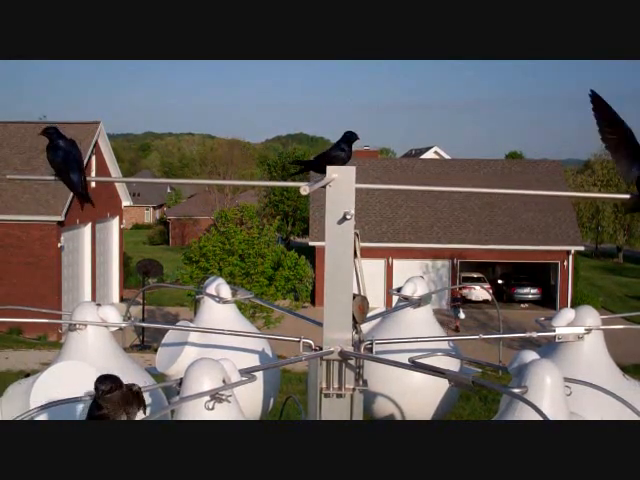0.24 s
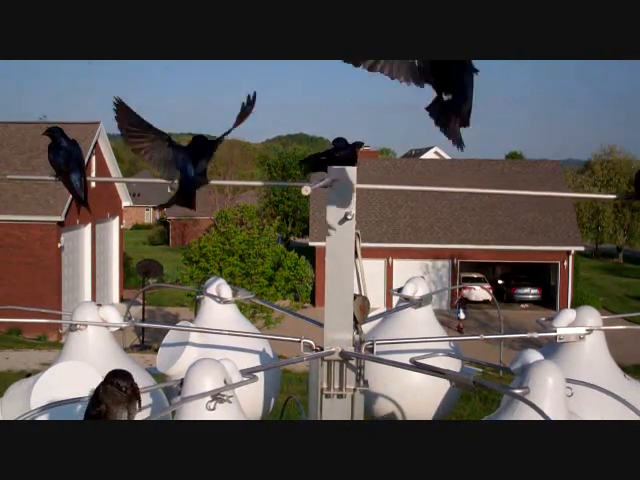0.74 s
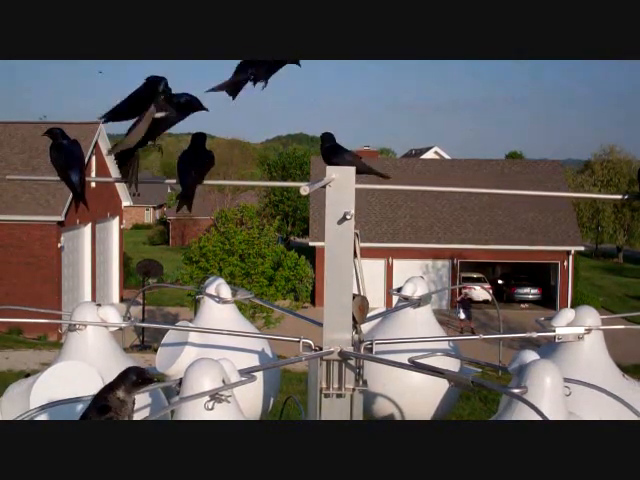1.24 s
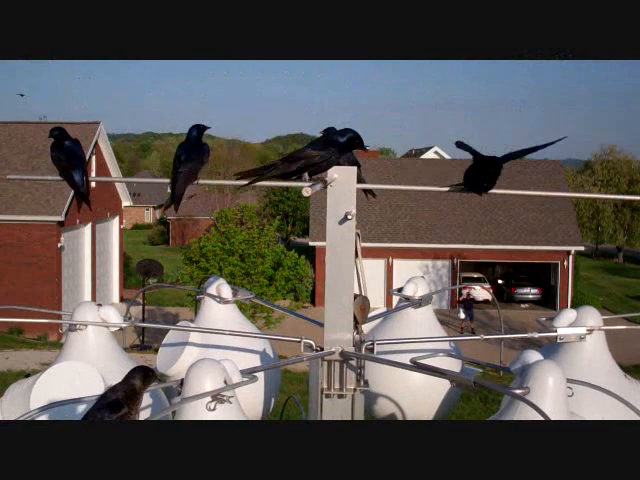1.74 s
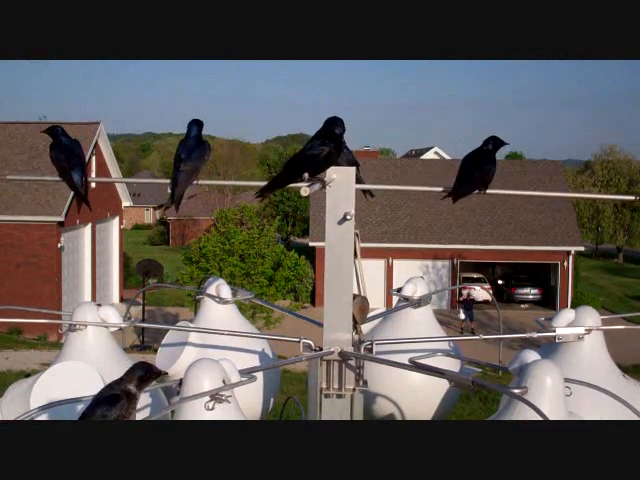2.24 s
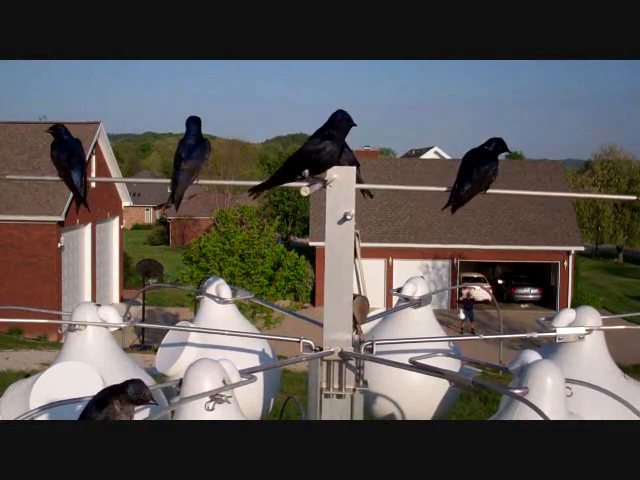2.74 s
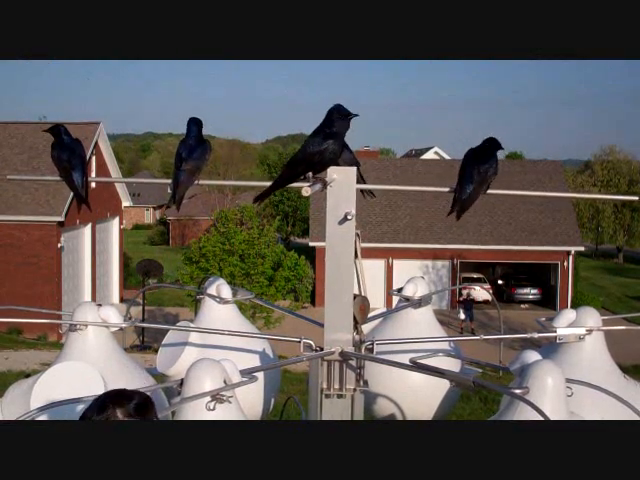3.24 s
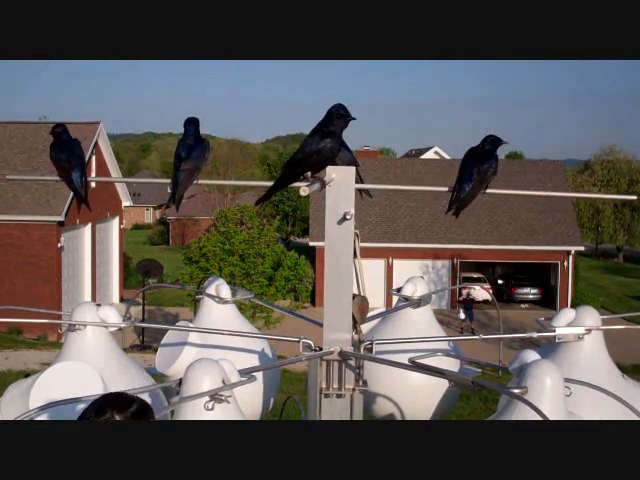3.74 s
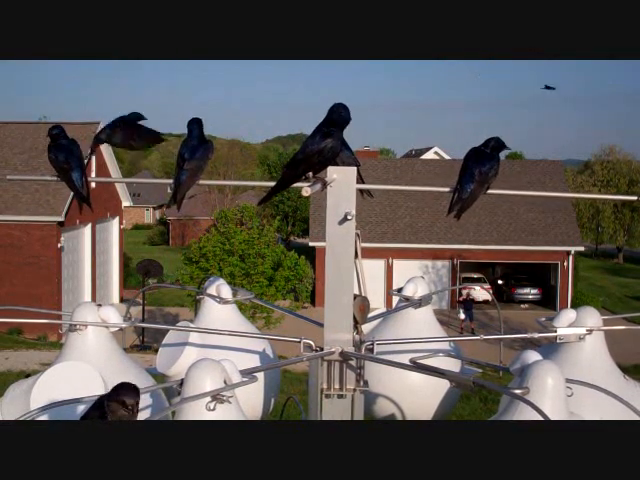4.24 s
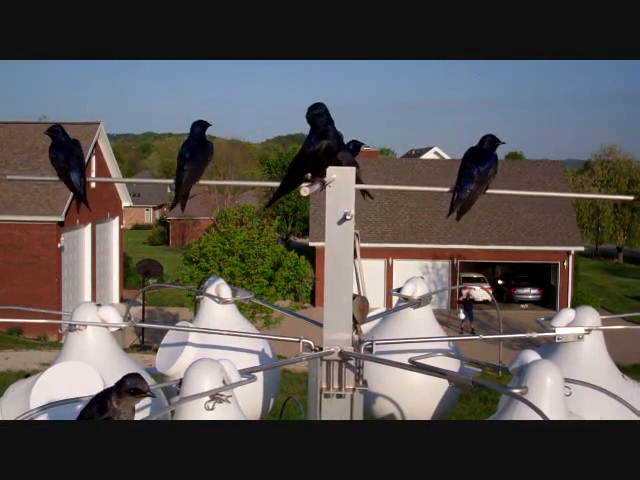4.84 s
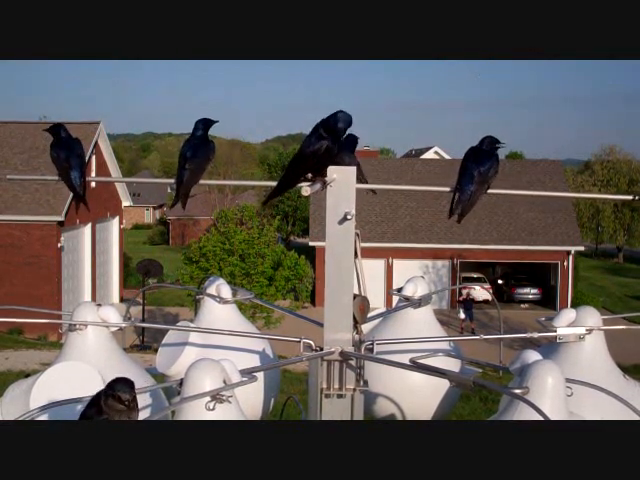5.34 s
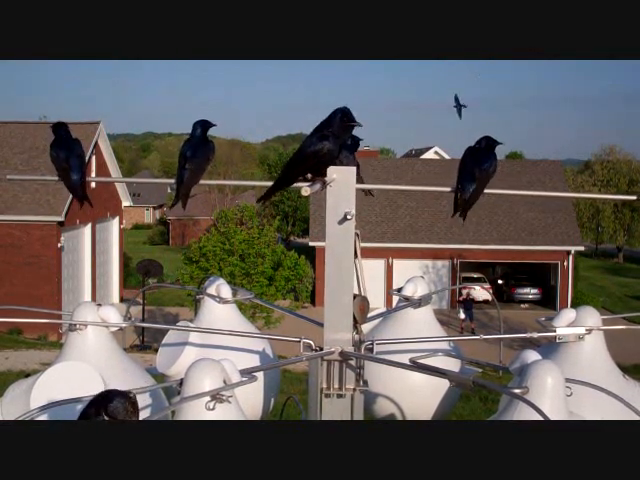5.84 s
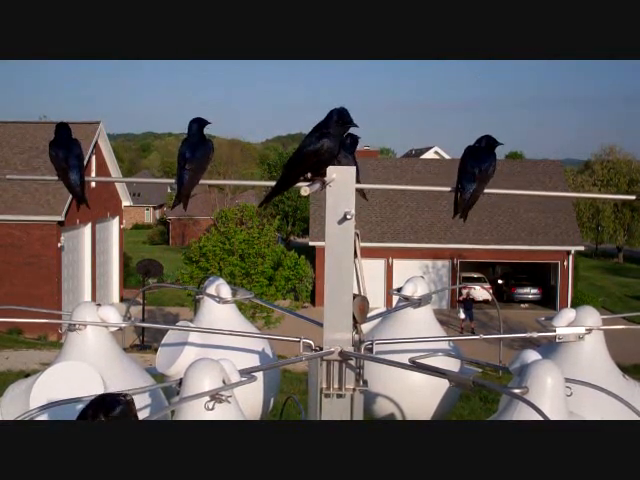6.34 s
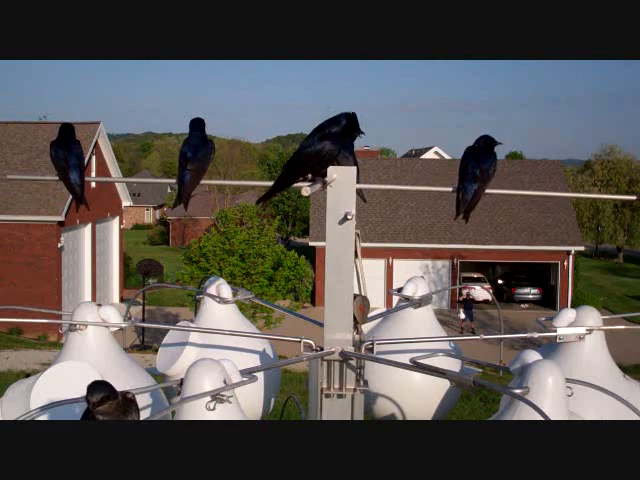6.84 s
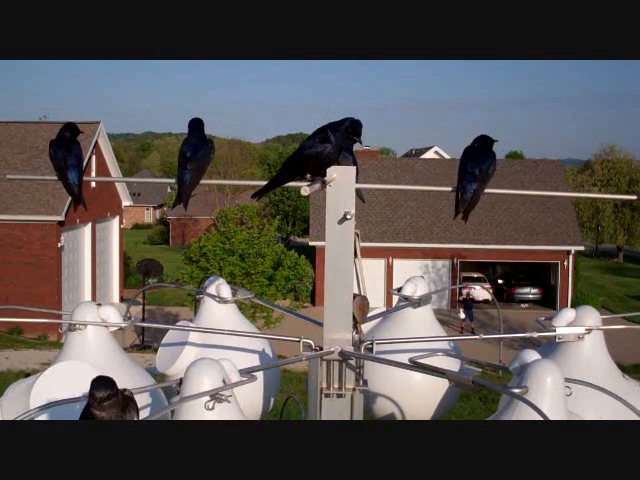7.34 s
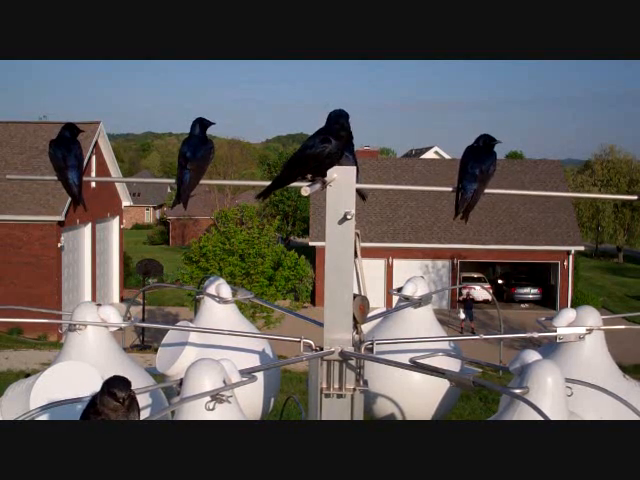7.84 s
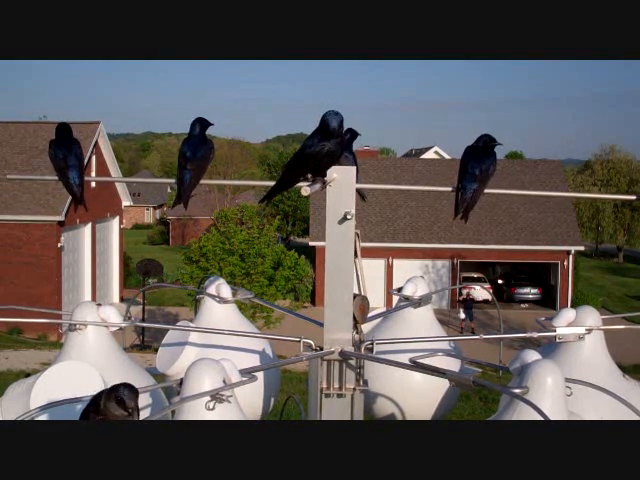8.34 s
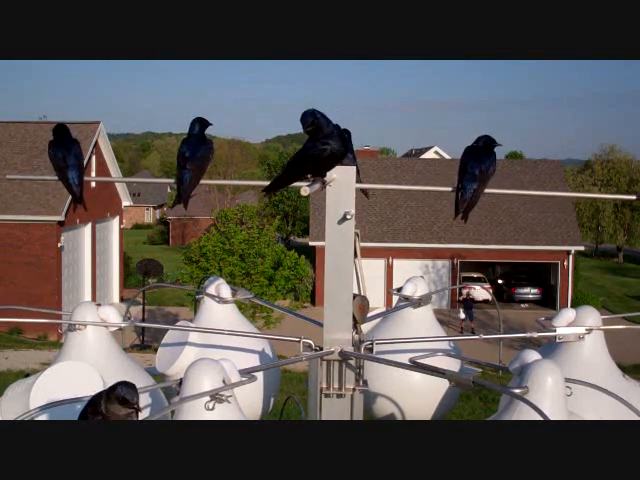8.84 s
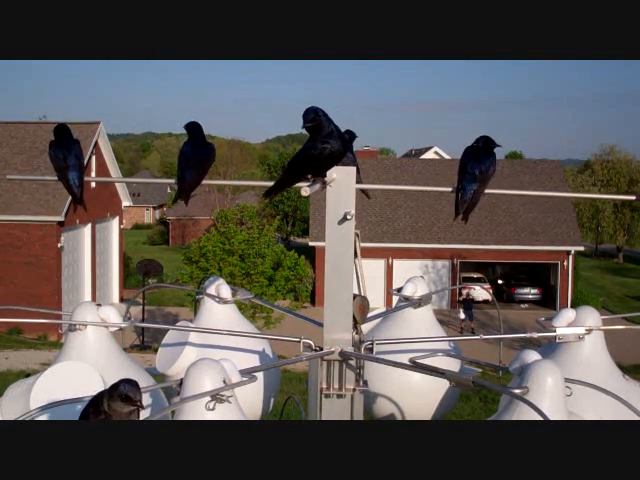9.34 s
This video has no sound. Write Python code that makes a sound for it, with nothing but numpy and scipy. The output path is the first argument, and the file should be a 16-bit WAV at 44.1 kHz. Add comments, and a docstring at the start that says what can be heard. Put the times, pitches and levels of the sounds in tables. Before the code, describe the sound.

A colony of purple martins calls close to stereo microphones in a rural yard, bright and a little left-heavy. From 0 to 0.7 s rough falling buzzes overlap quick scolding stutters; a loud dry rattle bursts at 0.8 s. Gurgling downward chews and more stutters crowd 0.9 to 2.7 s, with a strong one at 2.4 s, then a thinner stretch with a stutter near 2.9 s. At 4.0 and 4.3 s rattles return, followed by whistles, chirps and chews, strong around 5.5 to 6.1 s. Gliding whistles and tumbling chirps fill 6.2 to 6.9 s; a sharp stutter hits at 7.2 s. Dry clicks run from 7.55 to 8 s around a piercing chew at 7.7 s. Sparser calls follow, notably at 8.75 and 9.3 s. Faint distant birds, hiss, machine drone and slight air rumble continue throughout, dipping after loud calls and swelling back.

```python
"""Martin colony at a gourd rack

Rural yard, camera microphones close to the rack: purple martins buzz, stutter, chew, whistle, rattle, chirp and click.
Voices are gliding tones with overtones shaped by the beak; each call glances off the gourds and rings in the yard.
Farther off are more birds, hiss, a machine's drone and a light rumble of air.
The camera's limiter ducks the whole sound after loud calls, so the background dips and swells back."""
import sys
import numpy as np
from scipy import signal
from scipy.fft import rfft, irfft, next_fast_len
from scipy.io import wavfile
from scipy.ndimage import uniform_filter1d, minimum_filter1d, map_coordinates

SR = 44100
rng = np.random.default_rng(int(sys.argv[2]) if len(sys.argv) > 2 else 0)


def write(x):
    x = np.atleast_2d(x).T
    wavfile.write(sys.argv[1], SR, np.round(np.clip(x, -1, 1) * 32767).astype(np.int16))


N = 422919
TIME = np.arange(N) / SR  # seconds
EDGE_HZ = 14100  # upper band limit

# Call levels are nominal, ahead of beak colour, perch, stereo balance and limiter.
# distant hiss, its spectrum before levelling: [pitch_hz, relative_level_db]
HISS_SPECTRUM = [(25, -40), (60, -7.5), (220, -0.5), (400, 0), (800, 5), (1300, 1.5), (2200, -3),
                 (3500, -16.5), (6000, -19.5), (10500, -31), (13000, -38)]
# slow swell of that hiss: [time_s, level_db]
HISS_SWELL = [(0, -40.5), (1, -40), (2.3, -44), (3.7, -42.5), (5, -42), (6.3, -41.5), (7.5, -39.5),
              (8.6, -44), (9.6, -43)]
# hums of a far machine: [pitch_hz, width_hz at half amplitude, level_db]
DRONE_HUMS = [(52, 6.2, -72), (449.5, 11, -70), (587, 36, -51.5), (880, 17, -57)]
# throat and open beak, a resonance curve: [pitch_hz, gain_db]
BEAK_RESPONSE = [(900, -30.5), (1300, -15.5), (1800, -8.5), (2400, -1), (3000, 2), (4000, -2), (5000, -9.5),
                 (6200, -14.5), (7500, -14), (9500, -19.5), (11000, -24), (13000, -23)]
# partials of the syrinx from the fundamental up: [level_db]
SYRINX_PARTIALS = [0.5, -9, -10.5, -13, -14]
# falling buzzes: [start_s, length_s, start_hz, end_hz, level_db, fade_db (negative swells)]
BUZZ_CALLS = [(0, 0.05, 2970, 2835, -21.5, 17), (0.268, 0.12, 3430, 2510, -21.5, 4.5),
              (0.4, 0.14, 4080, 3120, -42.5, -18), (0.497, 0.064, 4280, 3565, -19, -14),
              (0.564, 0.11, 3500, 2714, -10, 11), (1.059, 0.13, 3670, 2620, -29.5, -9.5),
              (2.016, 0.13, 3860, 3280, -42.5, -10), (3.574, .15, 4220, 2510, -41.5, -3.5),
              (5.069, 0.14, 4070, 2920, -29.5, 13.5), (9.214, 0.085, 4300, 3370, -44.5, -15)]
# echo of the yard: [pitch_hz, decay_s over 60 dB]
YARD_DECAY = [(1000, 0.092), (3000, 0.32), (9000, 0.56)]
# scolding runs of downsweeps: [start_s, sweeps_count, spacing_s, top_hz, level_db, change_per_sweep_db]
STUTTER_CALLS = [(0.163, 3, 0.023, 3180, -16, 1.5), (0.413, 4, 0.02, 2800, -41, 4),
                 (.497, 5, .022, 3060, -19.5, 1.5), (0.938, 2, 0.022, 3300, -11.5, 1),
                 (1.555, 3, 0.022, 3167, -10, 0.5), (2.077, 2, 0.032, 2970, -35, 3.5),
                 (2.176, 2, 0.022, 2760, -39, -9), (2.895, 4, .031, 2994, -17.5, -1.5),
                 (3.134, 3, .024, 2530, -35, 3.5), (3.25, 4, 0.03, 2760, -48.5, 1),
                 (3.874, 2, .025, 2936, -31, 3.5), (4.024, 5, .022, 2857, -19, 0),
                 (7.197, 4, 0.03, 3900, -4.5, -4), (9.02, 4, 0.024, 2486, -36.5, 2),
                 (9.262, 3, 0.025, 3200, -37.5, 9.5)]
# start, middle and end of each stutter sweep: [pitch_ratio to its top]
STUTTER_SHAPE = (1.02, .79, .51)
# long falling 'chew' calls: [start_s, length_s, start_hz, level_db, overtones_db]
CHEW_CALLS = [(0.245, 0.077, 3900, -19.5, 5.5), (0.954, 0.095, 4180, -14.5, 8),
              (1.165, 0.088, 3896, -16.5, 6.5), (1.198, 0.087, 3650, -21.5, 8.5),
              (1.394, 0.065, 3636, -19.5, 7.5), (1.469, 0.063, 4470, -16, -13),
              (1.622, 0.075, 4060, -15.5, 7), (1.826, .071, 4090, -16, -0.5), (2.367, 0.064, 4840, -20, -8),
              (2.414, .069, 4410, -8, 0.5), (2.622, 0.064, 3780, -14, -5), (3.985, 0.056, 3930, -23.5, -9),
              (4.136, 0.051, 3660, -31, -7), (6.388, 0.05, 2920, -19.5, -9), (4.582, 0.068, 3544, -21.5, 6),
              (4.613, 0.058, 3200, -24, -1), (4.792, 0.056, 3550, -29, 7.5), (5.034, 0.061, 3780, -26.5, 3),
              (5.054, 0.054, 3720, -25.5, -9), (5.23, 0.068, 4200, -14, 1.5),
              (5.281, 0.055, 3330, -19.5, -5), (5.35, 0.054, 3950, -21.5, -7.5),
              (5.475, 0.062, 3820, -6, 1.5), (5.56, 0.087, 3780, -10.5, -7), (5.866, 0.061, 4470, -8, -6),
              (6.105, 0.058, 3260, -9, -6.5), (6.889, 0.077, 4780, -5.5, -2), (7.71, .073, 4950, 0, -5),
              (7.886, .07, 4180, -29.5, -5), (8.481, 0.082, 4550, -34, 0.5),
              (8.601, 0.066, 3970, -24.5, -3.5), (8.754, 0.08, 4430, -8, -1.5),
              (9.328, 0.058, 3130, -13.5, -5.5)]
# start, middle and end of the flick closing a chew: [pitch_hz]
FLICK_PITCHES = (2616, 2233, 1856)
# soft gliding whistles: [start_s, length_s, start_hz, end_hz, level_db]
WHISTLE_CALLS = [(0.291, 0.034, 2480, 2330, -23.5), (1.26, 0.062, 2150, 2020, -28),
                 (3.429, 0.041, 1860, 1950, -44), (4.358, 0.057, 2400, 2030, -25.5),
                 (4.556, 0.044, 3340, 3140, -31), (4.662, .052, 2797, 2524, -19),
                 (5.008, 0.079, 1847, 1978, -23), (5.243, .045, 2437, 2180, -19),
                 (5.382, 0.05, 1580, 1545, -24), (5.486, 0.086, 1540, 1577, -24),
                 (6.232, 0.034, 3710, 3230, -16.5), (6.278, 0.074, 3230, 2940, -16.5),
                 (6.348, 0.078, 2960, 2470, -18), (6.466, 0.039, 2090, 2150, -20),
                 (6.825, 0.027, 1340, 1180, -20), (6.91, 0.053, 1430, 1650, -22.5),
                 (7.026, 0.079, 1540, 1664, -23), (7.141, 0.052, 1334, 1540, -22),
                 (7.342, 0.11, 1200, 1430, -26.5), (7.451, 0.077, 3280, 3400, -42),
                 (7.583, 0.047, 1820, 1729, -28), (8.119, 0.041, 1964, 2234, -19)]
# pulse trains: [start_s, length_s, rate_per_s, top_hz, bottom_hz, level_db, fade_db]; pitches before sag and side ratios
RATTLE_CALLS = [(0.787, 0.108, 100, 3960, 2043, 4.5, 12.5), (4.039, 0.13, 67, 3757, 1890, -12.5, 22),
                (4.276, 0.1, 90, 4060, 2110, -3, 12.5)]
# points along one thin high whistle: [time_s, pitch_hz, level_db]
THIN_WHISTLE = [(1.75, 8360, -58), (1.858, 9050, -59), (2.03, 9150, -52.5), (2.21, 7250, -57.5)]
# short chirps: [start_s, length_s, start_hz, middle_hz, level_db]
CHIRP_CALLS = [(4.841, .033, 2963, 2860, -19.5), (4.881, 0.027, 2300, 2500, -17),
               (4.92, 0.03, 2400, 2260, -18), (5.2, 0.029, 2550, 2990, -18.5),
               (5.811, 0.026, 3270, 2835, -13.5), (5.857, 0.04, 2570, 2570, -19),
               (6.026, 0.025, 3590, 3480, -13), (6.068, 0.025, 3090, 3100, -12),
               (6.491, 0.024, 3460, 3210, -13.5), (6.538, 0.031, 2443, 2530, -12.5),
               (6.58, 0.027, 2030, 2310, -16), (6.648, 0.031, 2490, 2520, -25.5),
               (6.695, 0.026, 2320, 2320, -22.5), (6.729, .023, 3080, 3160, -18),
               (6.765, 0.026, 2440, 2970, -17.5), (6.804, 0.02, 1926, 2586, -14),
               (7.34, 0.019, 2260, 2360, -16.5), (7.766, 0.029, 3410, 3170, -16),
               (7.797, 0.021, 2230, 2480, -27), (7.842, 0.021, 2340, 2430, -17.5)]
# dry vocal clicks: [start_s, peak_level_db, pitch_hz]
CLICK_CALLS = [(5.746, -15, 2370), (6.25, -24, 4960), (6.351, -23, 5070), (7.551, -17.5, 2020),
               (7.589, -20.5, 2580), (7.623, -9, 3240), (7.701, -8, 3500), (7.802, -19, 4250),
               (7.905, -13, 5420), (8.005, -15.5, 4020)]
# left over right for the near birds: [pitch_hz, difference_db]
STEREO_BALANCE = [(1200, 0.5), (2200, 2), (4000, 3.5), (7500, 8.5), (12000, 11)]


def amp(db):
    """Decibels to amplitude ratio."""
    return 10 ** (np.asarray(db) / 20)


def evened(x):
    """Scales a sound to unit RMS."""
    return x / np.sqrt(np.mean(x ** 2) + 1e-20)


def read(points, hz):
    """Reads a spectral curve between its points along log frequency."""
    f, value = np.transpose(points)
    return np.interp(np.log(hz + 1), np.log(f), value)


def add(mix, s, sound):
    """Lays a sound into the mix at s seconds, cut at the end."""
    part = mix[..., max(round(s * SR), 0):][..., :sound.shape[-1]]
    part += sound[..., :part.shape[-1]]


def colour(x, gain):
    """Filters by a gain given as a function of frequency."""
    size = next_fast_len(x.shape[-1] + 2000)  # padded so the end does not wrap to the start
    spectrum = rfft(x, size) * gain(np.fft.rfftfreq(size, 1 / SR))
    return irfft(spectrum, size)[..., :x.shape[-1]]


def wander(t, rate):
    """Smooth chance of about unit size, with rate random points per second."""
    return map_coordinates(rng.standard_normal(512), [t * rate], order=3, mode="wrap")


def background(apart=0.27):
    """Distant hiss nearly alike in both ears, with a far machine's drone as narrow bands of noise."""
    noise = rng.standard_normal((2, N))
    mid, side = evened(colour(noise, lambda hz: amp(read(HISS_SPECTRUM, hz))))
    swell_db = np.interp(TIME, *np.transpose(HISS_SWELL))
    level = amp(swell_db + 0.12 * wander(TIME, 18))
    drone = np.zeros(N)
    for f, width, db in DRONE_HUMS:
        hum = colour(rng.standard_normal(N), lambda hz: 1 / (1 + ((hz - f) / width * 2) ** 2))
        drone += amp(db) * evened(hum)
    return level * np.array([mid + apart * side, mid - apart * side]) + drone


def breeze(breeze_db=-63, corner_hz=90):
    """Light air rumbles as wavering low noise, mostly on the left microphone."""
    noise = rng.standard_normal((2, N))
    rumble = evened(colour(noise, lambda hz: 1 / (1 + (hz / corner_hz) ** 2)))
    return amp(breeze_db + 2 * wander(TIME, 2.2)) * rumble * np.array([[1], [.3]])


def syrinx(hz, db, overtone_db):
    """A tone and its overtones; the beak favours about 3 kHz, so low notes sound reedy and high ones pure."""
    phase = 2 * np.pi * np.cumsum(hz) / SR
    voice = 0
    for k, part_db in enumerate(SYRINX_PARTIALS, 1):
        level_db = db + part_db + overtone_db * (k > 1) + read(BEAK_RESPONSE, k * hz)
        voice = voice + amp(level_db) * np.sin(k * phase) * (k * hz < EDGE_HZ)
    return voice * np.sqrt(2)


def note(row, rise, fall, hook, jitter, shimmer_db, overtone_db, second=0, trill=0, trill_hz=200, trill_db=0):
    """One syllable: the period follows a bow through three pitches; a fast trill turns it into a buzz."""
    s, length, first, middle, last, db, fade_db = row
    t = np.arange(0, length + (rise + fall) / 2, 1 / SR)
    u = np.clip((t - rise / 2) / length, 0, 1)
    bow = np.polyfit([0, .5, 1], [1 / first, 1 / middle, 1 / last], 2)
    hz = 1 / np.polyval(bow, u)
    beat = 2 * np.pi * trill_hz * t + wander(t, 62.5)
    # tension builds, then lets go
    hz *= 1 - hook * np.exp(-t / 0.0013) - hook * np.exp((t - t[-1]) / 0.0041)
    hz *= 1 + jitter * wander(t, 238.0) + trill * np.sin(beat)
    level_db = db - fade_db * u + shimmer_db * wander(t, 162.6) + trill_db * np.cos(beat)
    ramp = np.clip(np.minimum(t / rise, (t[-1] - t) / fall), 0, 1)
    edges = np.sin(np.pi / 2 * ramp) ** 2
    # the other side of the syrinx joins late and beats with the first: sum and difference tones gurgle
    side_phase = 2 * np.pi * np.cumsum(hz) * rng.uniform(0.17, .45) / SR
    gurgle = 1 + second * u * (1 + wander(t, 329) / 2) * np.sin(side_phase)
    opening_db = overtone_db + 3 * wander(t, 50.5)  # the beak's opening wavers
    return s - rise / 2, edges * gurgle * syrinx(hz, level_db, opening_db)


def perch(sound, bounce_db=-21, spread=.00003):
    """Each call has its own small delay between the ears and glances off the gourds in four echoes per ear."""
    sound = np.pad(sound, (0, 1200))  # room for the echoes
    delays, signs = rng.uniform(0.0011, 0.024, (2, 4)), rng.choice([-1, 1], (2, 4))
    lag = rng.normal() * spread  # seconds
    # two of the echoes reach both ears
    delays[1, :2] = delays[0, :2] + lag
    signs[1, :2] = signs[0, :2]
    t = np.arange(len(sound)) / SR
    echoes = [sum(sign * np.roll(sound, round(d * SR)) for d, sign in zip(*ear))
              for ear in zip(delays, signs)]
    right = map_coordinates(sound, [(t - abs(lag)) * SR], order=3)
    return np.array([sound, right]) + amp(bounce_db) * np.array(echoes)


def buzz(s, length, start_hz, end_hz, db, fade_db):
    """A slow, even fall roughened by a fast trill."""
    row = (s, length, start_hz, np.sqrt(start_hz * end_hz), end_hz, db, fade_db)
    return note(row, rise=0.0049, fall=0.076, hook=0.084, jitter=0.0112, shimmer_db=2.5, overtone_db=-3.5,
                trill=0.057, trill_hz=201, trill_db=3.5)


def rasp(birds, rasp_db=-23.0):
    """Air rushing through the beak follows the strength of the voice."""
    effort = np.sqrt(abs(uniform_filter1d(birds[0] ** 2, size=300)))  # left ear, over about 7 ms
    noise = rng.standard_normal((2, N))
    air = colour(noise, lambda hz: amp(read(BEAK_RESPONSE, hz)) * hz / (hz + 1500))
    return amp(rasp_db) * effort * evened(air)


def yard(x):
    """A thin, short echo from the houses and trees: sparse random taps decaying by frequency."""
    taps = rng.standard_normal((2, SR // 2)) * (rng.random((2, SR // 2)) < 1500 / SR)
    hz, t, z = signal.stft(taps, SR, nperseg=256)
    decay = amp(-60 * t / read(YARD_DECAY, hz)[:, None])
    tail = signal.istft(z * decay * (t > .005), SR, nperseg=256)[1]
    return signal.fftconvolve(x, tail / np.linalg.norm(tail[0]), axes=1)[:, :N]


def far_birds(count=170, far_db=-57.5):
    """Other martins call at random around the yard: faint, nearly pure falling notes with strong bounces."""
    out = np.zeros((2, N))
    for when, size, pitch, near in rng.random((count, 4)):
        top = 2300 + 2200 * pitch
        row = (when * TIME[-1], 0.0149 + 0.071 * size, top, top * .76, top * 0.29, far_db + 4 * near, 0)
        s, sound = note(row, rise=0.0049, fall=0.013, hook=0.21, jitter=0.012, shimmer_db=8, overtone_db=-24)
        add(out, s, perch(sound, bounce_db=1))
    return out


def stutter(s, sweeps, spacing, top_hz, db, step_db):
    """Evenly spaced downsweeps that sink in pitch, each with a fainter, steeper answer from the other side."""
    sink, fade_db = .035, 3.5  # pitch share lost per sweep; fade within each sweep
    sounding, answer_lag, answer_length = .85, .55, 0.45  # shares of the spacing
    voices = []
    for k in range(round(sweeps)):
        pitches = top_hz * (1 - sink * k) * np.array(STUTTER_SHAPE)
        level_db = db + step_db * k
        answer_s = s + (k + answer_lag) * spacing
        voices += [(s + k * spacing, sounding * spacing, *pitches, level_db, fade_db),
                   (answer_s, answer_length * spacing, *pitches, level_db - 10.5, fade_db)]
    return [note(r, rise=0.0028, fall=0.004, hook=0.13, jitter=0.015, shimmer_db=2.0, overtone_db=-7.0,
                 second=0.42) for r in voices]


def chew(s, length, top_hz, db, overtone_db):
    """A bowed fall to one landing pitch, then a flick from the other side of the syrinx."""
    end_hz, bow = 1700, 0.97  # the bow sags below an even glide
    fade_db = 0.46 * (db + 30)  # the opening push relaxes by this share toward -30 dB
    fall = (s, length, top_hz, bow * np.sqrt(top_hz * end_hz), end_hz, db, fade_db)
    flick = (s + 0.97 * length, .028, *FLICK_PITCHES, db - fade_db - 1, 7)
    return [note(fall, rise=.009, fall=0.0013, hook=0.092, jitter=0.0082, shimmer_db=3.3,
                 overtone_db=overtone_db, second=0.17),
            note(flick, rise=0.0077, fall=.009, hook=0.033, jitter=0.02, shimmer_db=7.0,
                 overtone_db=overtone_db - 3, second=0.15)]


def whistle(s, length, start_hz, end_hz, db):
    """A nearly pure, smooth glide that grows slightly between its soft edges."""
    row = (s, length, start_hz, (start_hz + end_hz) / 2, end_hz, db, -1.5)  # negative fade: it swells
    return note(row, rise=0.01, fall=0.01, hook=0.052, jitter=.002, shimmer_db=2, overtone_db=-13.5)


def rattle(row, sag=0.11, overtone_db=0, lower=.55, lower_db=-12, hiss_db=-15):
    """Each pulse sweeps down, the other side of the syrinx answers lower in the gaps; the train sinks and fades."""
    s, length, rate, top, bottom, db, fade_db = row
    t = np.arange(0, length, 1 / SR)
    u = t / length
    level_db = db - fade_db * u ** 2 - 9 * np.exp(-t / 0.0016)  # softened onset
    breath = colour(rng.standard_normal(len(t)), lambda hz: amp(read(BEAK_RESPONSE, hz)))
    out = amp(level_db + hiss_db) * evened(breath)
    for lag, pitch, side_db in [(0, 0.94, 0), (.5, lower, lower_db)]:
        cycle = np.maximum(t * rate - lag, 0) % 1
        sweep = top + (bottom - top) * cycle ** 3.2
        hz = pitch * sweep * (1 - sag * u) * (1 + 0.02 * wander(t, 915))
        out += np.sin(np.pi * cycle ** 0.98) ** 2 * syrinx(hz, level_db + side_db, overtone_db)
    return s, out * signal.windows.tukey(len(t), .05)


def thin_whistle():
    """A small bird's faint, arched pure tone, far above the martins."""
    s, hz, db = np.transpose(THIN_WHISTLE)
    t = np.arange(s[0], s[-1], 1 / SR)
    arch_hz = np.polyval(np.polyfit(s, hz, 2), t)  # a smooth curve near the pitch points
    phase = 2 * np.pi * np.cumsum(arch_hz) / SR
    level = amp(np.interp(t, s, db) + wander(t, 85))
    return s[0], level * np.sin(phase) * signal.windows.tukey(len(t), .1)


def chirp(s, length, start_hz, middle_hz, db):
    """A short note bent through its middle pitch that hooks down at its end."""
    fade_db = 0.31 * (db + 28.5)  # relaxes by this share toward -28.5 dB
    row = (s, length, start_hz, middle_hz, .8 * middle_hz, db, fade_db)
    return note(row, rise=0.005, fall=0.0083, hook=0.157, jitter=0.021, shimmer_db=3.5, overtone_db=-7.5,
                second=0.22)


def click(row, decay=0.00057, snap=0.13):
    """A single snap of the syrinx rings the throat for a moment."""
    s, db, hz = row
    t = np.arange(0, .012, 1 / SR)
    ring = np.sin(2 * np.pi * hz * t) + snap * rng.standard_normal(len(t))
    return s, amp(db) * ring * t / decay * np.exp(1 - t / decay)


def near_birds():
    """All the calls close to the microphones, each from its own perch, with a left-right tilt by pitch."""
    calls = [buzz(*r) for r in BUZZ_CALLS]
    calls += [voice for r in STUTTER_CALLS for voice in stutter(*r)]
    calls += [voice for r in CHEW_CALLS for voice in chew(*r)]
    calls += [whistle(*r) for r in WHISTLE_CALLS]
    calls += [rattle(r) for r in RATTLE_CALLS]
    calls += [thin_whistle()]
    calls += [chirp(*r) for r in CHIRP_CALLS]
    calls += [click(r) for r in CLICK_CALLS]
    out = np.zeros((2, N))
    for s, sound in calls:
        add(out, s, perch(sound, bounce_db=-18, spread=.00004))
    return colour(out, lambda hz: amp(read(STEREO_BALANCE, hz) * np.array([[.5], [-.5]])))


def scene():
    """The rack up close, the yard's echo and the distance behind it."""
    near, far = near_birds(), far_birds()
    echo = yard(amp(-15.5) * near + amp(-9.5) * far)
    return near + rasp(near) + far + echo + background() + breeze()


def record(dry, ceiling_db=-14, recovery_db=33, top_hz=11000):
    """A peak limiter drops at once, holds about 0.1 s, then recovers in dB per second; then the band limit."""
    over_db = np.maximum(20 * np.log10(abs(dry).max(0) + 1e-9) - ceiling_db, 0)
    # negated minimum = running maximum, shifted to look ahead about 1 ms
    held_db = -minimum_filter1d(-over_db, size=4401, origin=2160, mode="constant")
    fall = TIME * recovery_db
    duck_db = np.maximum.accumulate(held_db + fall) - fall
    ducked = dry / amp(uniform_filter1d(duck_db, size=60))
    # the microphones' treble falls away steeply
    ducked = colour(ducked, lambda hz: 1 / np.sqrt(1 + (hz / top_hz) ** 24))
    lowpass = signal.firwin(511, EDGE_HZ, window=("kaiser", 9), fs=SR)
    return signal.oaconvolve(ducked, lowpass[None], "same")


dry = scene()
out = record(dry)
write(out)
```